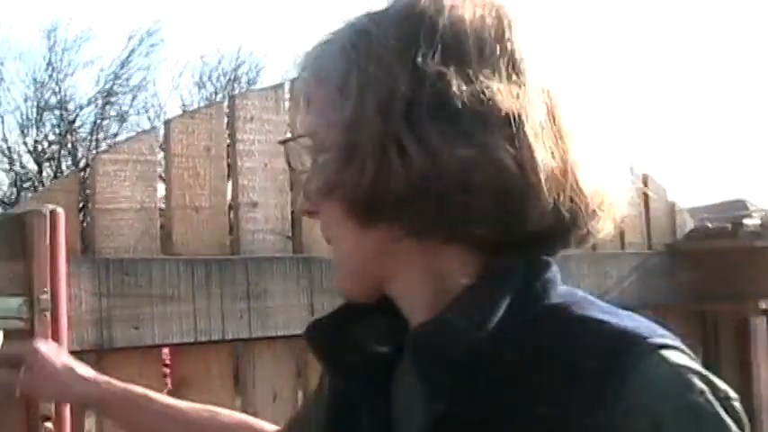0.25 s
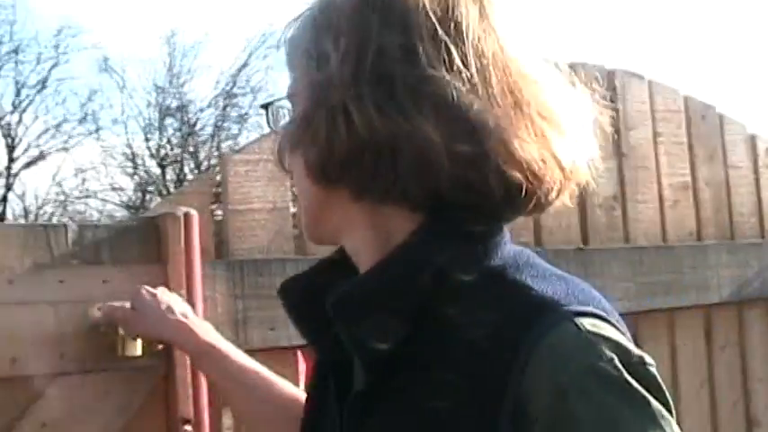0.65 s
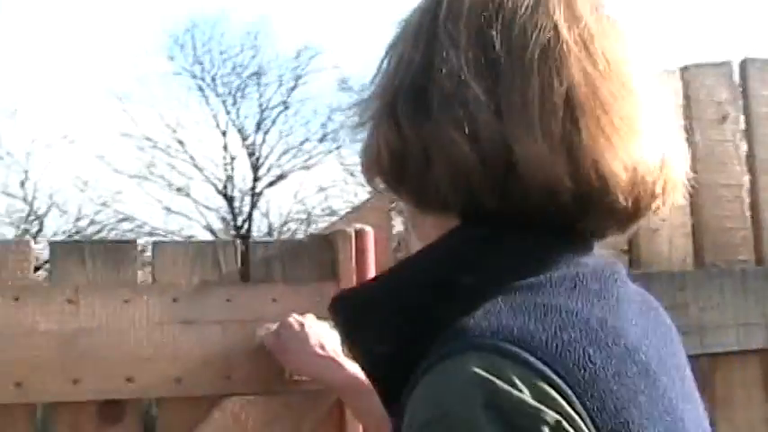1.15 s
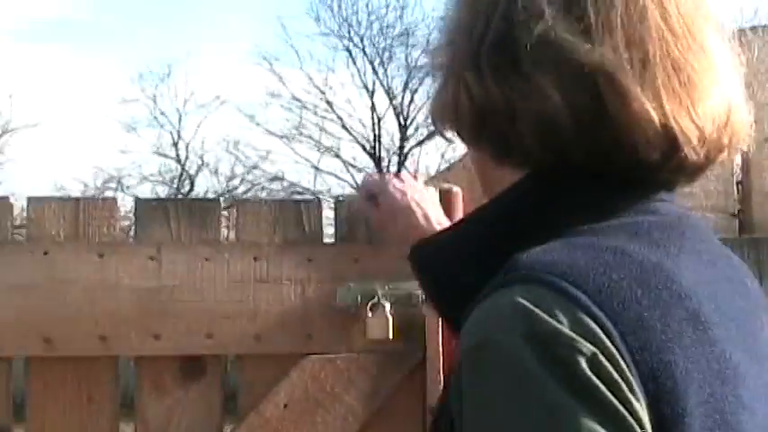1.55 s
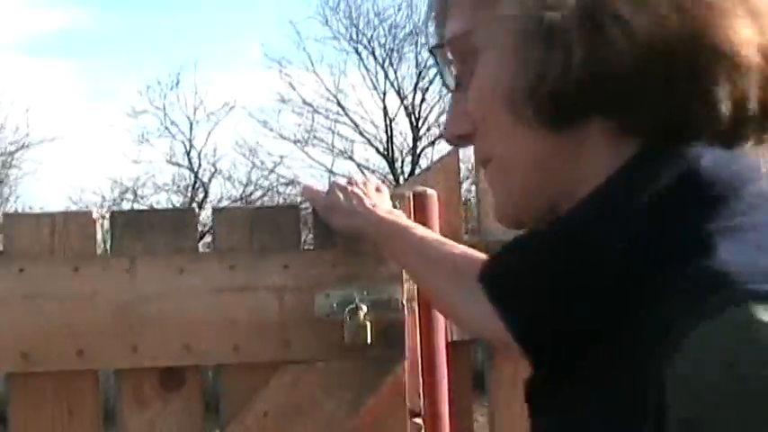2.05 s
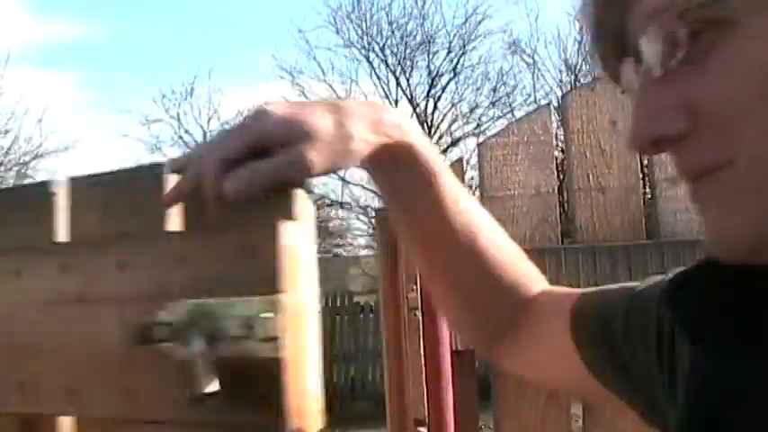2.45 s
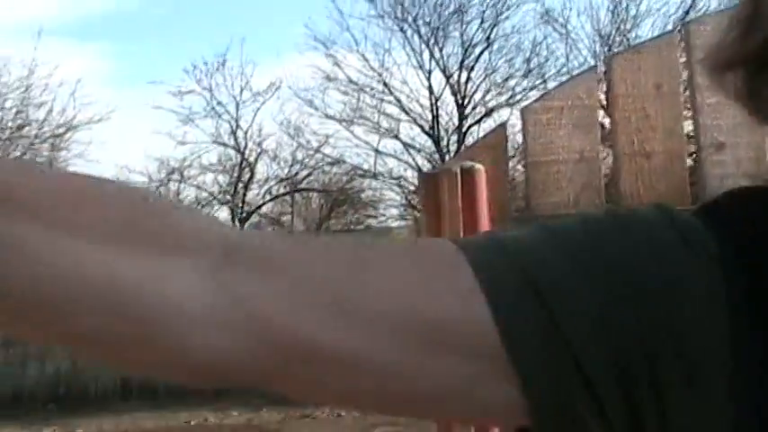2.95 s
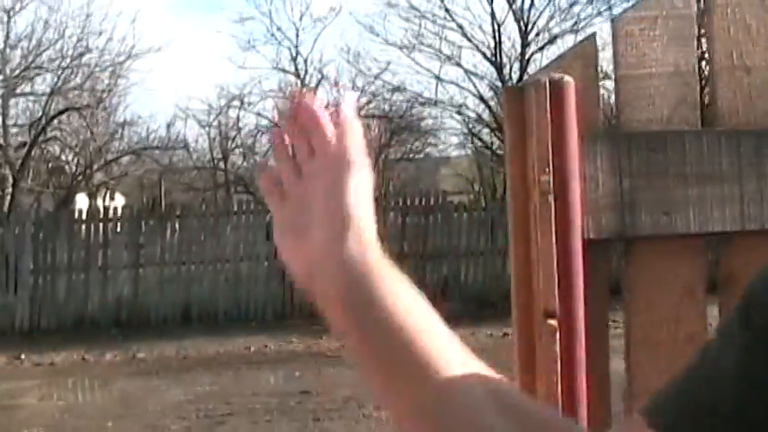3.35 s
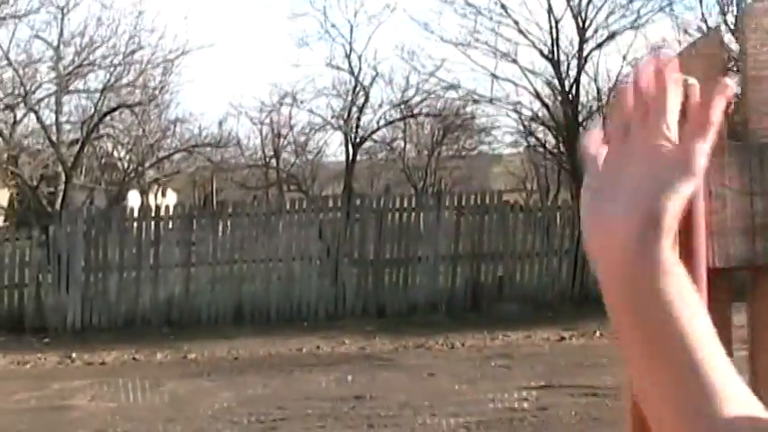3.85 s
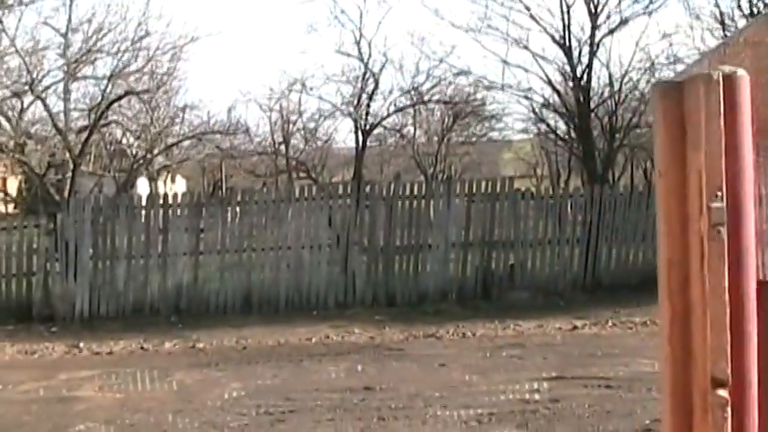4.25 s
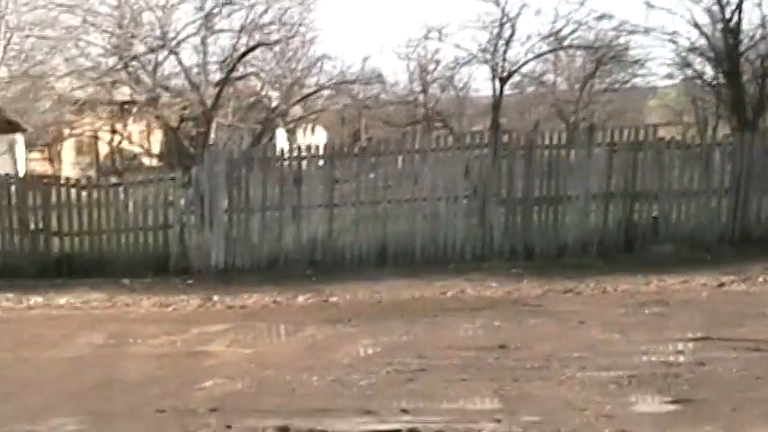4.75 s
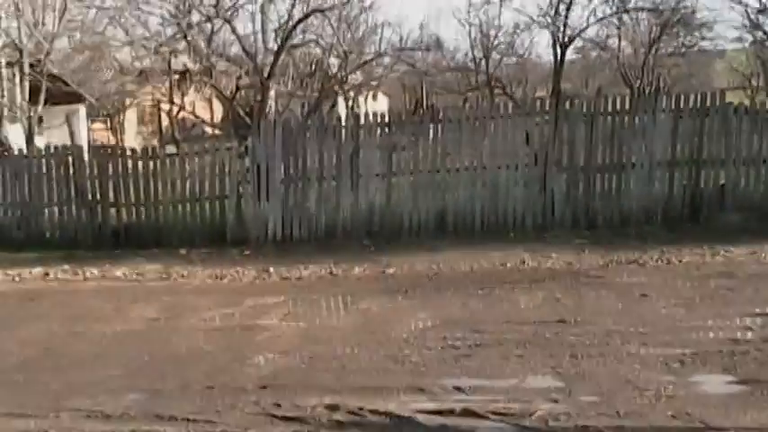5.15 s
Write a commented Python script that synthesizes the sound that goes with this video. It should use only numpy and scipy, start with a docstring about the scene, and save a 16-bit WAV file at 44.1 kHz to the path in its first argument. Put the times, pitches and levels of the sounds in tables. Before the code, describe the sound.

Feet crunch over gritty dirt beside a wooden gate that knocks and clicks, with brief bird chirps and low wind thumping the microphone.

```python
"""A wooden yard gate, heard from a microphone carried close to the feet; a quiet hush lies behind it all.
At once a foot crunches on dirt and gravel (bursts of noise grains) and the boards knock (damped wood modes).
Small birds chirp a little way off (bending whistles), then the bolt clicks until 2.1 s (noise and metal modes).
Steps, grating stones and ticking pebbles go on; the birds return from 3 to 4 s, and the feet crunch on to the end.
Wind rumbles and thumps on the capsule throughout (low noise and short swings), hardest near 3.8 to 4.8 s."""
import sys
import numpy as np
from scipy import signal
from scipy.fft import rfft, irfft, next_fast_len
from scipy.io import wavfile
from scipy.ndimage import uniform_filter1d

SR = 44100
rng = np.random.default_rng(int(sys.argv[2]) if len(sys.argv) > 2 else 0)


def digitize_waveform(pressure):
    """Quantize a signal to 16-bit integers and store it at the path in sys.argv[1].

    Rows of a 2-D input are taken as channels; values are limited to [-1, 1].
    """
    field = np.atleast_2d(pressure).T
    bounded = np.clip(field, -1, 1)
    quanta = np.round(bounded * 32767).astype(np.int16)
    wavfile.write(sys.argv[1], SR, quanta)


N = 238669  # samples, 5.4 s


# Colour of the distant outdoor hush. Each row: frequency in Hz, relative weight in dB.
YARD_COLOUR = [(120, 6.5), (200, -2), (445, 2.5), (859, -6.5), (2090, -9.5), (2320, -12.5), (3320, -7.5),
               (6290, -23.5), (11500, -36), (13000, -45), (14000, -85)]
# Bird notes, one bend each. Each row: start in seconds, length in seconds, first, middle and last pitch in Hz,
# level in dB at the middle of the note, before the warble.
BIRD_NOTES = [(0, .045, 2120, 2110, 2100, -33), (.362, .04, 4300, 4950, 5200, -43),
              (.392, .03, 2950, 3600, 3850, -28), (.415, .04, 3850, 3880, 3900, -29),
              (.425, .023, 4250, 4300, 4200, -34), (.43, .03, 5000, 5050, 5150, -42),
              (.443, .042, 3850, 3150, 2900, -28), (.468, .046, 2200, 2100, 2000, -32),
              (.48, .032, 3850, 3900, 4150, -33), (.505, .02, 3800, 3550, 3300, -36),
              (.52, .025, 3100, 2950, 2850, -33), (.552, .044, 2150, 2100, 1850, -33),
              (3.075, .027, 2900, 2780, 2650, -26), (3.855, .065, 5050, 5100, 5000, -52),
              (3.86, .04, 5200, 5600, 5400, -54), (3.865, .03, 2900, 2800, 2450, -38),
              (3.905, .017, 3620, 3620, 3600, -38), (3.918, .05, 4300, 5600, 4100, -45),
              (3.925, .042, 2550, 3270, 3480, -29), (3.965, .038, 3450, 2980, 2700, -30),
              (4.0, .025, 2950, 3250, 3480, -29), (4.02, .08, 3470, 3450, 3450, -30)]
# Wind rumble on the microphone, swelling and dropping into lulls. Each row: time in seconds, rumble level in dB.
WIND_LEVELS = [(0, -37), (.36, -27.5), (.56, -18), (.72, -16), (.92, -10), (1.04, -29), (1.45, -29),
               (1.87, -9.5), (2.03, -29), (2.4, -45), (2.82, -30), (2.97, -16), (3.17, -19.5),
               (3.24, -32.5), (3.58, -25), (3.72, -25), (3.9, -10), (4.02, -14), (4.27, -34), (4.46, -15),
               (4.75, -8), (5.03, -19), (5.12, -41), (5.26, -35), (5.41, -13)]
# Single buffets that thump the capsule. Each row: moment of the peak in seconds, peak push in dB,
# time to fall 20 dB either side in seconds (its sign has no effect), pitch of the thump in Hz.
WIND_BUFFETS = [(.13, -23.5, -0.2, 69.8), (.54, -6, 0.02, 55.1), (0.651, -6.5, 0.06, 50.3),
                (1.09, -24, 0.5, 60), (1.31, -23.5, 0.4, 69.8), (1.55, -15.5, -0.02, 59.8),
                (1.97, -15.5, -0.22, 70.9), (3.125, -12.5, 0.13, 69.3), (3.63, -17, 0.03, 59.9),
                (3.771, -2, -0.02, 74.44), (3.83, -12.5, 0.11, 80), (3.9, -7, 0.05, 80),
                (4.09, -4.5, 0.08, 94.96), (4.158, -3, 0.1, 80), (4.355, -8, -0.08, 85),
                (4.51, -21, -0.17, 55.4), (4.587, -2, -0.05, 74.9), (4.688, -1, 0.01, 89.4),
                (4.76, -4.5, .06, 49.45), (4.96, -9, 0.12, 50), (5.2, -13, 0.08, 74.9),
                (5.33, -8.5, .075, 65)]
# Colour of the eddies at the capsule. Each row: frequency in Hz, relative weight in dB.
WIND_COLOUR = [(7.1, -42), (12, -21), (42, -3.5), (86, -7.5), (105, -6.5), (187, -12), (303, -26),
               (383, -28.5), (500, -52), (650, -66), (1100, -120)]
# Single pebbles tick. Each row: start in seconds, peak level in dB, pitch in Hz.
PEBBLE_TICKS = [(.442, -21, 1500), (1.204, -22, 3300), (2.118, -12, 3090), (3.053, -14.5, 2820),
                (3.101, -4.5, 2830), (3.109, -7, 1950), (3.31, -27, 3160), (3.812, -13.5, 3450),
                (4.568, -15, 3360), (4.664, -18, 2900), (4.689, -20, 3650), (4.7, -13, 3770),
                (4.74, -11, 3130), (4.78, -18, 2970), (4.947, -24, 3080)]
# The gate boards knock. Each row: start in seconds, peak level in dB, settled pitch in Hz, 60 dB decay in seconds,
# first pitch as a multiple of the settled one while the plank is pressed.
BOARD_KNOCKS = [(.068, -11, 440, 0.095, 1), (.155, -1.5, 395, 0.057, 1), (.713, -7, 494, 0.058, 1),
                (.835, -8.5, 547, 0.1, 1), (1.015, 2.5, 476.4, 0.068, .6), (1.024, -0.5, 520, 0.054, .75),
                (1.13, -8.5, 503, 0.054, 1), (2.0535, 5.5, 410, 0.019, 1), (2.1042, 4, 1040, 0.025, 1),
                (2.1087, 7, 366, 0.036, 1), (2.119, 3, 321, 0.041, 1.3), (2.397, -5.5, 628, 0.12, 1),
                (5.107, -5, 657, 0.13, 1)]
# Wood modes of a plank. Each row: multiple of the knock's pitch, level in dB, share of the knock's decay time.
BOARD_MODES = [(.55, -15, 5.7), (0.997, 6.5, 1.67), (1.4, 1, 0.8), (2.7, 1.5, 0.32), (3.5, -14, 0.34),
               (4.6, -17, 0.22)]
# The gate bolt clicks. Each row: start in seconds, peak level in dB, treble relative to it in dB,
# factor on the ring's decay time.
BOLT_CLICKS = [(0.7473, 8.5, -15, 0.64), (1.035, 5.5, -17, 0.71), (1.1638, -0.5, -25, 0.75),
               (1.3997, -4, -47, 0.67), (1.4247, -5.5, -13, 1), (2.0561, 11, -42, 0.2)]
# Metal modes of the bolt. Each row: nominal pitch in Hz, nominal level in dB,
# 60 dB decay in seconds before the cap and the click's factor.
BOLT_RINGS = [(990, -1, 0.079), (1870, -26.5, 0.046), (2180, -27, 0.073), (2570, 3, 0.22),
              (2740, 21.5, 0.067), (3000, -5, 0.017), (3316, 7, 0.068), (3970, -36, 0.17),
              (4400, -19, 0.047)]
# Each footfall or scuff. Each row: start in seconds, rise in seconds, hold in seconds, crunch level in dB,
# sag over the hold in dB, fade after it in dB per second, fine grit relative to the crunch in dB,
# soil body relative to the crunch in dB.
FOOTFALLS = [(.057, 0.0084, 0.1, -16, 5.5, 87, -14, -3.5), (0.356, 0.0247, 0.13, -28, 20, 300, -18, -16),
             (0.707, 0.0062, 0.04, -26.5, -2.5, 300, -13, 5), (0.758, 0.033, 0.13, -18.5, 0, 215, -12, -4),
             (1.009, 0.02, 0.028, -11, 8, 90, -14.5, -0.5), (1.195, 0.045, 0.014, -28, 5.5, 32, -14, 5.5),
             (1.477, 0.016, 0.0132, -15.5, 1, 263, -18.5, -9),
             (1.546, 0.034, .01, -10, -0.5, 128, -17.5, -8.5),
             (1.889, 0.011, 0.014, -15.5, 0, 103, -11.5, -11),
             (2.034, 0.017, 0.047, -15.5, 0.5, 252, -17, 0.5),
             (2.139, 0.023, 0.093, -29.5, 0, 200, -10.5, -4),
             (2.231, 0.019, 0.11, -12, 8.5, 202.5, -13, -13), (2.353, 0.056, 0.018, -14, 0.5, 132, -13, -9),
             (2.523, 0.024, 0.22, -14, -2, 107, -16, -13.5),
             (3.091, 0.027, 0.022, -29, -0.5, 104, -21, -1.5),
             (3.321, 0.065, 0.29, -9.5, 8.5, 166, -12.5, -12),
             (4.023, 0.0089, 0.15, -24.5, 1, 198, -6, -9.5), (4.1, 0.026, 0.31, -16.5, 0, 138, -8.5, -12),
             (4.558, 0.037, .07, -32.5, -2, 90, -12, -2.5), (5.01, 0.0095, 0.045, -16, 0, 188, -5.5, -14),
             (5.067, 0.017, 0.22, -11.5, 7.5, 200, -10.5, -9.5),
             (5.323, 0.029, 0.029, -14, 5, 80, -4, -10.5)]
# Stones slip under the sole in a burst. Each row: start in seconds, peak crunch level in dB,
# fine grit relative to it in dB, pitch of the grating stone in Hz, that stone's peak level in dB.
STONE_SLIPS = [(0.068, -22.5, 0, 2765, -10), (0.158, -15, -12, 2720, -17), (.7115, -31, -15, 3460, -18),
               (.8584, -17, -10, 3240, -7), (0.8797, -25, -1, 3066, -11), (1.0202, -16.5, -2, 3260, -11),
               (1.2157, -20, -16, 3300, -17), (1.4822, -23.5, -2.5, 3200, -9),
               (1.582, -7, -10.5, 2680, -2.5), (1.6094, -13, -17, 3380, -21), (1.649, -24, -21, 1980, -10),
               (1.914, -11, -7, 3260, -7), (1.9574, -20.5, -6, 2990, -8), (2.2338, -29.5, -9, 3320, -25.5),
               (2.251, -8.5, -20, 3120, -11), (2.2813, -6.5, -17, 4140, -3.5), (2.326, -24, -3, 3200, -10),
               (2.364, -18.5, 6.5, 3040, -6), (2.3947, -10.5, -1.5, 3140, -14),
               (2.534, -13.5, -2, 3126, 0.5), (2.5526, -14, 2, 3200, -10), (2.599, -9, -8.5, 3100, -19),
               (2.664, -16, -3.5, 1740, -12), (2.74, -15, -8, 3100, -29), (2.8294, -26.5, 2, 2100, -28),
               (2.861, -19, -7, 3150, -34), (3.016, -17.5, -29, 2740, -19),
               (3.3286, -11.5, -4.5, 3060, -14), (3.361, -24, -21.5, 3150, -8), (3.402, -24, 5, 3120, -21),
               (3.455, -12.5, -3, 3160, -12), (3.498, -9.5, -6, 2940, -7), (3.54, -16, -7, 3150, -8),
               (3.635, -17, -10, 3050, -15), (3.68, -18.5, -6, 3460, -15), (4.024, -22, 2, 3400, -44),
               (4.114, -16, 4, 2733, -12), (4.1624, -10, -5.5, 3050, -24), (4.2103, -19, 2.5, 1905, -6.5),
               (4.2488, -11.5, -5, 1870, -9), (4.2839, -7.5, -7, 3230, -9), (4.3777, -17, -17, 3054, -20),
               (4.398, -15.5, -24, 2980, -24), (5.017, -4, -5, 2630, -2.5), (5.0783, -25, -5, 3050, -15),
               (5.1207, -14, -5, 2995, -7), (5.344, -18.5, 1, 3500, -12), (5.3895, -9.5, -7.5, 3020, -14)]
# Colour of the breaking grit. Each row: frequency in Hz, relative weight in dB.
GRAVEL_COLOUR = [(120, -8), (200, -19), (248, -7.5), (313, -4.5), (597, -1.5), (641, -3), (767, -5.5),
                 (1140, -7.5), (1720, -6), (2640, -3), (3100, -6), (5510, -14), (8320, -14), (11700, -21.5),
                 (14500, -40)]
# Stones and packed soil ring as they grind. Each row: pitch in Hz, width in Hz, level in dB before it wanders.
GRINDING_RINGS = [(530, 320, -12.5), (1038, 170, -11), (1290, 37, -7.5), (1767, 25, -3.5), (1928, 23, -2),
                  (2116, 20, -1), (2310, 100, -9.5), (2870, 34, 0.5), (3091, 68, 7), (3364, 132, 1.5),
                  (3883, 30, -3.5), (4264, 47, -2), (4950, 40, -7.5), (5940, 100, -44), (6400, 360, -15)]

YARD_DB, YARD_SWELL_DB = -28.5, 2.3
NOTE_ENDS_DB = 5  # how much softer a bird note is at both ends
WARBLE_DB, WARBLE_HZ = 2.2, 35  # spread of the birds' unsteady level and pitch
FLUTTER_DB, FLUTTER_SLOPE = -22.5, .35  # flutter at a rumble of 0 dB; dB of flutter per dB of rumble
EVENNESS = .4  # share of the rumble's own chance swells that is smoothed away
THUMP_DB = 1.5  # the swing relative to the buffet's push
PEBBLE_CLICK_DB, PEBBLE_TAP_DB = -26, -4  # relative to the tick
RISE_FROM_DB = 11  # how far below its peak a step starts
SLIP_T60_S, SLIP_SOIL_DB, SCRAPE_T60_S = 0.073, -12, 0.13
CLUMP_DB, CLUMPS_PER_S = 1.6, 45
CAVITY_HZ, CAVITY_WIDTH_HZ, CAVITY_DB, GAIN_DB = 3460, 740, 3, -6
LEFT_BASS_HZ, RIGHT_BASS_HZ, TOP_HZ = 38.3, 10.4, 14900


def undb(db):
    """Amplitude factor of a level in dB."""
    return 10 ** (np.asarray(db) / 20)


def unit(x):
    """Scale to an rms of 1."""
    return x / np.sqrt(np.mean(x ** 2))


def colour(x, shape):
    """Weight the spectrum by (Hz, dB) points joined on a log axis."""
    hz, db = np.transpose(shape)
    n = next_fast_len(len(x))
    f = np.fft.rfftfreq(n, 1 / SR) + 1
    weights = undb(np.interp(np.log(f), np.log(hz), db))
    return irfft(rfft(x, n) * weights, n)[:len(x)]


def band(x, lo_hz, hi_hz):
    """Keep one band of the sound."""
    return signal.sosfilt(signal.butter(2, [lo_hz, hi_hz], "bandpass", fs=SR, output="sos"), x)


def split(x, lo_hz, hi_hz):
    """Middle, high and low parts that add up to the whole."""
    n = next_fast_len(len(x))
    f, spectrum = np.fft.rfftfreq(n, 1 / SR), rfft(x, n)
    low = 1 / (1 + (f / lo_hz) ** 4)
    high = 1 - 1 / (1 + (f / hi_hz) ** 4)
    return [irfft(spectrum * share, n)[:len(x)] for share in (1 - low - high, high, low)]


def resonance(x, hz, width_hz):
    """Pass the sound through one narrow resonance."""
    return signal.lfilter(*signal.iirpeak(hz, hz / width_hz, SR), x)


def walk(rate):
    """Random levels held 1 / rate s and slewed twice; spread 1."""
    k = int(SR / rate)
    steps = np.repeat(rng.standard_normal(N // k + 1), k)
    return unit(uniform_filter1d(uniform_filter1d(steps, k), k)[:N])


def decay(t, t60):
    """Exponential fall by 60 dB in t60 seconds."""
    return np.exp(-np.log(1000) * t / t60)


def fade(t60, rise):
    """A quick rise and an exponential fall, peak 1."""
    t = np.arange(int(SR * np.clip(t60, .004, .4))) / SR
    shape = (1 - np.exp(-t / rise)) * decay(t, t60)
    return t, shape / shape.max()


def add(out, s, sound, db):
    """Mix a short sound in at time s with its peak at db."""
    i = int(s * SR)
    out[i:i + len(sound)] += (undb(db) * sound / np.abs(sound).max())[:N - i]


def yard():
    """Distant outdoor hush: coloured noise that swells a little."""
    hush = unit(colour(rng.standard_normal(N), YARD_COLOUR))
    return undb(YARD_DB + YARD_SWELL_DB * walk(4.5)) * hush


def birds():
    """Whistles that bend through three pitches with soft ends, and a scattered echo from the fences."""
    out = np.zeros(N)
    level, pitch = undb(WARBLE_DB * walk(150)), WARBLE_HZ * walk(200)
    for s, length, first, middle, last, db in BIRD_NOTES:
        u = np.linspace(-1, 1, int(length * SR))  # -1 at the first pitch, 0 at the middle, 1 at the last
        hz = middle + (last - first) / 2 * u + ((first + last) / 2 - middle) * u ** 2
        ends = np.clip((1 - np.abs(u)) * length / .004, 0, 1) * undb(db - NOTE_ENDS_DB * u ** 4)
        here = slice(int(s * SR), int(s * SR) + len(u))
        whistle = np.sqrt(2) * np.sin(2 * np.pi * np.cumsum(hz + pitch[here]) / SR)
        out[here] += ends * level[here] * whistle
    tail = fade(.15, .01)[1]
    echo = tail * rng.standard_normal(len(tail))
    echo /= np.sqrt(np.sum(echo ** 2))
    return out + undb(-4) * signal.fftconvolve(out, echo)[:N]


def wind():
    """Eddies buffet the capsule in uneven pushes, each swinging it at a low pitch; flutter grows more slowly."""
    grid_s = .002
    t, fine = np.arange(0, N / SR, grid_s), np.arange(N) / SR
    power = undb(np.interp(t, *np.transpose(WIND_LEVELS))) ** 2
    swing = 0 * t
    for (s, db, width, hz), turn in zip(WIND_BUFFETS, rng.random(len(WIND_BUFFETS))):
        push = undb(db - 20 * ((t - s) / width) ** 2)
        power = power + push ** 2
        swing = swing + push * np.sin(2 * np.pi * (hz * t + turn))
    power = np.interp(fine, t, power)
    swing = signal.resample(swing, int(len(t) * grid_s * SR) + 1)[:N]

    eddies = colour(rng.standard_normal(N) * undb(1.55 * walk(30)), WIND_COLOUR)
    rumble, flutter, _ = split(eddies, 12, 110)
    swells = np.abs(uniform_filter1d(uniform_filter1d(rumble ** 2, size=1500), size=1500))
    rumble = np.sqrt(power) * unit(rumble / swells ** (EVENNESS / 2))
    flutter = undb(FLUTTER_DB) * power ** (FLUTTER_SLOPE / 2) * unit(flutter)
    return rumble + undb(THUMP_DB) * swing + flutter


def pebbles():
    """Tiny stone ticks: a few ms of noise about one pitch, with a click above and a dull tap below."""
    out = np.zeros(N)
    for s, db, hz in PEBBLE_TICKS:
        t, tick = fade(0.039, 0.00043)
        noise = rng.standard_normal(len(t)) * tick
        add(out, s, band(noise, hz / 1.62, hz * 1.152), db)
        add(out, s, band(noise, 4500, 22000), db + PEBBLE_CLICK_DB)
        add(out, s, band(noise, 890, 1570), db + PEBBLE_TAP_DB)
    return out


def boards():
    """Planks bump the post: damped wood modes, some settling in pitch as the contact lets go, with a rattle."""
    out = np.zeros(N)
    t = np.arange(int(.2 * SR)) / SR
    for s, db, hz, t60, first in BOARD_KNOCKS:
        turns = np.cumsum(1 + (first - 1) * np.exp(-t / 0.0093)) * hz / SR
        body = sum(undb(g) * np.sin(2 * np.pi * multiple * turns) * decay(t, t60 * share)
                   for multiple, g, share in BOARD_MODES)
        rattle = undb(2.6 * unit(uniform_filter1d(rng.standard_normal(len(t)), size=150)))
        add(out, s, body * rattle, db)
    return out


def bolt():
    """A steel bolt on wood: a crack of noise and short metal modes."""
    out = np.zeros(N)
    ring_t = np.arange(int(.12 * SR)) / SR
    for s, db, treble_db, scale in BOLT_CLICKS:
        t, crack = fade(0.018, 0.000045)
        noise = rng.standard_normal(len(t)) * crack
        add(out, s, band(noise, 1460, 4240), db)
        add(out, s, band(noise, 3500, 14600), db + treble_db)
        ring = 0
        for hz, g, t60 in BOLT_RINGS:
            # each click strikes the modes at different levels and slightly different pitches
            level = undb(g + 6 * rng.standard_normal())
            pitch = hz * (1 + 0.04 * rng.standard_normal())
            ring = ring + level * np.sin(2 * np.pi * pitch * ring_t) * decay(ring_t, min(t60, .035) * scale)
        add(out, s, ring, db + 1)
    return out


def scrapes():
    """In each slip one stone grates hardest and rings roughly at its own pitch."""
    out = np.zeros(N)
    t, burst = fade(SCRAPE_T60_S, 0.0033)
    for s, _, _, hz, ring_db in STONE_SLIPS:
        add(out, s, resonance(rng.standard_normal(len(t)), hz, 81) * burst, ring_db)
    return out


def pressure():
    """Power of crunch, grit and soil: each step rises, holds while it sags, then fades; slips add sharp bursts."""
    levels = np.zeros((3, N))
    for s, rise, hold, db, sag_db, fade_db, grit_db, soil_db in FOOTFALLS:
        i = int(s * SR)
        t = np.arange(min(N - i, SR)) / SR
        shape = np.interp(t, [0, rise, rise + hold], [-RISE_FROM_DB, 0, -sag_db])
        shape = shape - fade_db * np.maximum(t - rise - hold, 0)
        levels[:, i:i + SR] += np.outer(undb([0, grit_db, soil_db]) ** 2, undb(db + shape) ** 2)
    burst = fade(SLIP_T60_S, 0.00085)[1] ** 2
    for s, db, grit_db, _, _ in STONE_SLIPS:
        i = int(s * SR)
        peaks = undb(db + np.array([0, grit_db, SLIP_SOIL_DB])) ** 2
        levels[:, i:i + len(burst)] += np.outer(peaks, burst)[:, :N - i]
    return levels


def gravel():
    """Dense grains of breaking grit, each a brief puff of noise; the foot's pressure and slips set their level."""
    # about 900 grains and 200 snaps a second
    cracks = (rng.random(N) < 900 / SR) * undb(np.minimum(5.0 * rng.exponential(1, N), 20))
    puffs = unit(signal.fftconvolve(cracks, fade(0.038, 0.00013)[1])[:N])
    grains = rng.standard_normal(N) * (1.22 + puffs)
    # a single stone snaps: a bare click of either sign
    snaps = (rng.random(N) < 200 / SR) * undb(2 * rng.exponential(1, N)) * rng.choice([-1, 1], N)
    grains += undb(15) * snaps
    # which stones are caught under the sole changes all the time, so each ring comes and goes
    rings = sum(undb(db + 4.5 * walk(21.905)) * unit(resonance(grains, hz, width))
                for hz, width, db in GRINDING_RINGS)
    sound = unit(colour(grains, GRAVEL_COLOUR)) + undb(-3.5) * unit(rings)
    # grit gives way in clumps, partly apart in each register: crunch, fine grit, soil body
    clumps = walk(CLUMPS_PER_S)
    out = np.zeros(N)
    for power, part in zip(pressure(), split(sound, 1300, 5500)):
        clumping = undb(CLUMP_DB * (clumps + walk(CLUMPS_PER_S)) / np.sqrt(2))
        out += np.sqrt(power) * unit(part * clumping)
    return out


def scene():
    """The yard, birds, gate and feet on two close ports, with the wind equal on both."""
    near = yard() + birds() + pebbles() + boards() + bolt() + scrapes() + gravel()
    # a faint, slightly late copy of these sounds, wandering in level, sets the channels apart
    side = undb(-33.5) * band(np.roll(near, 40), 2250, 9000) * walk(6)
    return near + side * np.array([[1], [-1]]) + wind()


def record(dry):
    """The capsule cavity lifts one band, the left channel loses deep bass sooner, peaks clip, the top is cut."""
    cavity = resonance(dry, CAVITY_HZ, CAVITY_WIDTH_HZ)
    lifted = undb(GAIN_DB) * (dry + (undb(CAVITY_DB) - 1) * cavity)
    coupled = [signal.lfilter(*signal.butter(1, hz, "highpass", fs=SR), channel)
               for hz, channel in zip((LEFT_BASS_HZ, RIGHT_BASS_HZ), lifted)]
    clipped = np.clip(coupled, -1.02, 1.02)
    return signal.sosfilt(signal.ellip(12, .2, 90, TOP_HZ, fs=SR, output="sos"), clipped)


dry = scene()
out = record(dry)
digitize_waveform(out)
```